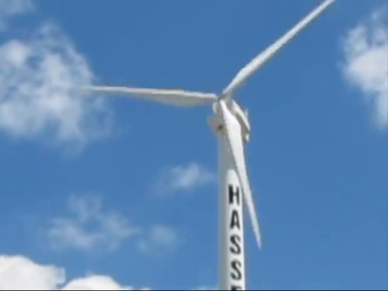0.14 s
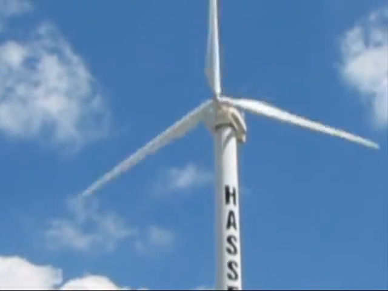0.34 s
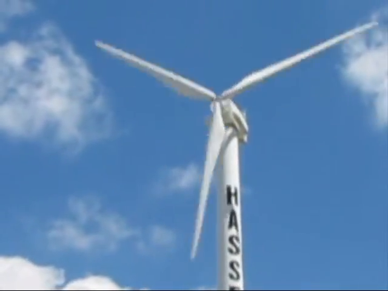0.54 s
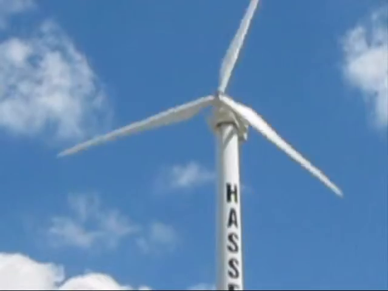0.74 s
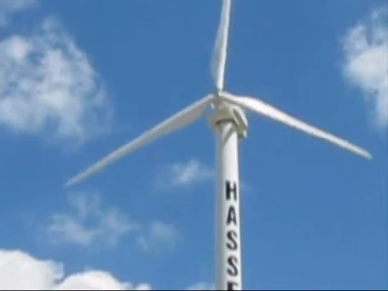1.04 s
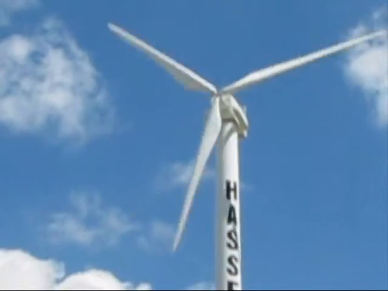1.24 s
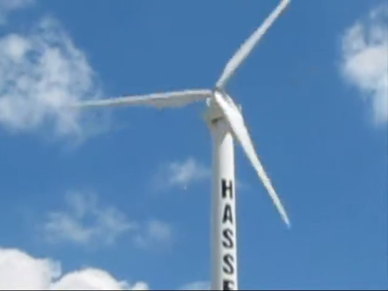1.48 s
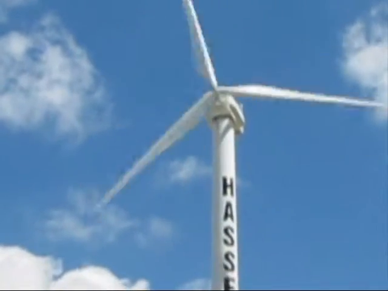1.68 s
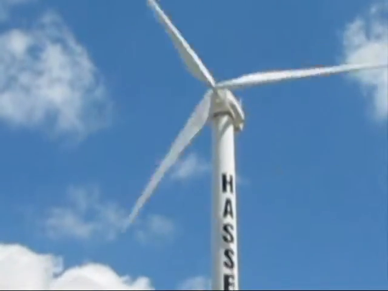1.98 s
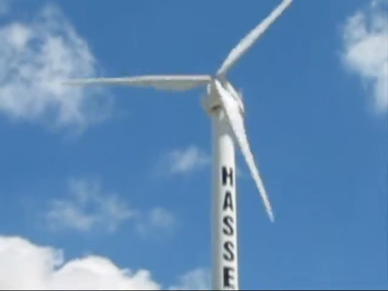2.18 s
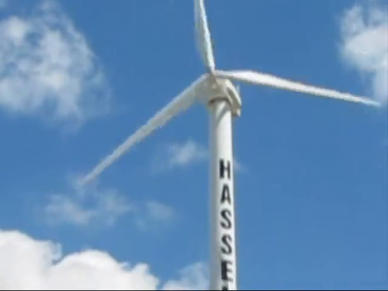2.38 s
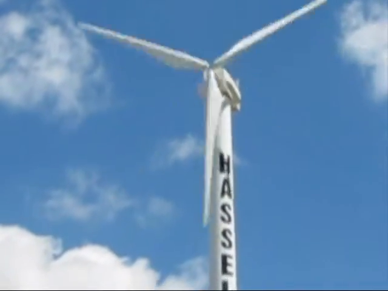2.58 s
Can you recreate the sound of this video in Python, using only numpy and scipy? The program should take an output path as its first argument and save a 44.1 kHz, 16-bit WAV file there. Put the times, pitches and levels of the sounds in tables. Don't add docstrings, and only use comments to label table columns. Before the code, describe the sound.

Low, fluttering wind noise hits an unprotected microphone below a wind turbine; after a brief calm start, irregular thumps continue, becoming denser and crackly late, over soft blade whooshes and coarse, grainy hiss.

```python
import sys
import numpy as np
from scipy import signal
from scipy.fft import rfft, irfft
from scipy.io import wavfile
from scipy.ndimage import uniform_filter1d, map_coordinates

SR = 44100
rng = np.random.default_rng(int(sys.argv[2]) if len(sys.argv) > 2 else 0)


def gain_from_db(level_db):
    decades = np.asarray(level_db, float) / 20
    return 10 ** decades


def materialize(psi):
    bounded = np.clip(np.atleast_2d(psi).T, -1, 1)
    quanta = np.round(bounded * 32767).astype(np.int16)
    wavfile.write(sys.argv[1], SR, quanta)


N = 119952


def read(points, hz):
    point_hz, level_db = np.transpose(points)
    return np.interp(np.log(hz + 1), np.log(point_hz + 1), level_db)


def evened(x):
    return x / np.sqrt(np.mean(x ** 2) + 1e-20)


def curve(table, column):
    rows = np.array(table)
    return np.interp(np.arange(N) / SR, rows[:, 0], rows[:, column])


def lumps(rate_hz):
    b, a = signal.butter(2, rate_hz, fs=SR)
    return evened(signal.lfilter(b, a, rng.standard_normal(N)))


def noise(spectrum, patchy_db, size):
    frames = 4 * N // size + 5
    hz = np.fft.rfftfreq(size, 1 / SR)
    real, imag, patches = rng.standard_normal((frames, len(hz), 3)).T
    patches = uniform_filter1d(patches, size=5, axis=0)
    patches = evened(uniform_filter1d(patches, size=5, axis=1))
    level_db = read(spectrum, hz)[:, None] + patchy_db * patches
    spectra = (real + 1j * imag) * gain_from_db(level_db)
    return evened(signal.istft(spectra, nperseg=size, noverlap=3 * size // 4)[1][:N])


def wind():
    # start_s, strength_db, small_eddies_db
    gusts = [(0.0, -55, -9), (0.06, -54.5, -10), (0.33, -43, -6.5), (1.07, -43, -5.5), (1.14, -44, -5.5),
             (1.17, -40.5, 0.5), (1.21, -48, -7), (1.3, -39.5, -10.5), (1.67, -44.5, -3.5),
             (1.69, -38, -9.5), (2.08, -49, 0.5), (2.14, -47.5, -3), (2.19, -44.5, -5), (2.72, -42, 1)]
    # frequency_hz, density_db (per Hz)
    large_eddies = [(12, -20), (20, -15.5), (65, -1), (129, -1), (220, -7), (394, -21), (897, -31),
                    (2640, -66)]
    # frequency_hz, density_db (per Hz)
    small_eddies = [(60, -29.5), (150, -3.5), (260, 2.5), (450, -6), (800, -15.5), (1500, -26.5),
                    (2500, -47.5), (5000, -66)]
    strength_db, small_db = curve(gusts, column=1), curve(gusts, column=2)
    rumble = noise(large_eddies, patchy_db=0.0, size=2048)
    rumble = rumble * gain_from_db(-2.5 + 0.41 * lumps(rate_hz=12))
    flutter = noise(small_eddies, patchy_db=2.5, size=512)
    flutter = flutter * gain_from_db(-6 + small_db + 2.04 * lumps(rate_hz=74))
    return gain_from_db(strength_db) * (rumble + flutter)


def turbine():
    # start_s, level_db, brightness_db
    blades = [(0.0, -71, 4), (0.01, -86, -4.5), (0.42, -68, 1.8), (0.51, -63.5, 0), (0.58, -69.5, 0.5),
              (0.69, -75, -1), (0.98, -65, -1.2), (1.2, -78.5, -1.5), (1.43, -67.5, -2), (1.45, -73.5, 9),
              (1.64, -67.5, 0), (2.05, -73.5, -4), (2.07, -75.5, 1), (2.67, -82.5, 3), (2.7, -66, -13),
              (2.72, -90, -4)]
    # frequency_hz, density_db (per Hz)
    swish_spectrum = [(200, 1), (500, 7), (1000, 5), (1600, 4), (2000, -2), (3000, -1), (4200, -9.5),
                      (5500, -16.5)]
    level_db, brightness_db = curve(blades, column=1), curve(blades, column=2)
    body = noise(swish_spectrum, patchy_db=1.5, size=1024)
    high_pass = signal.firwin(101, 1930, pass_zero=False, fs=SR)
    top = signal.oaconvolve(body, high_pass, "same")
    swish = (body - top) * gain_from_db(-brightness_db) + top
    swish = swish * gain_from_db(5 + level_db + 0.39 * lumps(rate_hz=35))
    tone_hz, tone_db = 2998, -90
    tone = np.sqrt(2) * np.sin(2 * np.pi * tone_hz * np.arange(N) / SR)
    return swish + gain_from_db(tone_db) * tone


def flicks(table, gain_db, turns, rough, below_db, above_db):
    size = 4096
    out = np.zeros(N + size)
    t, hz = (np.arange(size) - size // 2) / SR, np.fft.rfftfreq(size, 1 / SR)
    draws, phases = rng.standard_normal((len(table), size)), 2 * np.pi * rng.random(len(table))
    for (start_s, peak_db, centre_hz), draw, phase in zip(table, draws, phases):
        octaves = np.log2((hz + 1) / centre_hz)
        rise_db = -below_db * octaves
        fall_db = above_db * octaves - 3.5 * octaves ** 2
        colour = gain_from_db(np.where(octaves > 0, fall_db, rise_db))
        bell = np.exp(-(t * centre_hz / turns) ** 2)
        swing = np.fft.fftshift(irfft(colour * np.exp(1j * phase)))
        roughness = rough * evened(irfft(rfft(draw) * colour))
        burst = bell * (swing / abs(swing).max() + roughness)
        at = round(start_s * SR)
        out[at:at + size] += gain_from_db(peak_db + gain_db) * burst / abs(burst).max()
    return out[size // 2:N + size // 2]


def eddies():
    # start_s, peak_db, centre_hz
    large = [(0.333, -34.5, 99), (0.412, -34.5, 94), (0.437, -35, 123), (0.455, -46, 85),
             (0.477, -39.5, 75), (0.508, -39, 96), (0.557, -32.5, 116), (0.583, -31.5, 101),
             (0.616, -30.5, 150), (0.634, -33.5, 165), (0.687, -31.5, 135), (0.711, -44, 102),
             (0.786, -44, 116), (0.802, -45, 140), (0.829, -40, 102), (0.848, -39, 115), (0.925, -34, 113),
             (0.945, -38.5, 135), (0.968, -36, 117), (1.019, -33, 117), (1.067, -33.5, 132),
             (1.095, -36.5, 90), (1.156, -32.5, 117), (1.176, -36, 157), (1.263, -37.0, 125),
             (1.283, -56, 127), (1.308, -33, 124), (1.328, -52, 134), (1.377, -37.4, 140), (1.41, -34, 114),
             (1.434, -33.1, 107), (1.541, -41, 177), (1.6, -41, 119), (1.633, -33.5, 155),
             (1.687, -54, 114), (1.731, -28, 96), (1.786, -36, 96), (1.83, -34.5, 128), (1.865, -32, 126),
             (1.931, -37, 120), (1.992, -34.5, 115), (2.04, -34, 169), (2.056, -31.5, 146),
             (2.081, -35.5, 118), (2.126, -36, 158), (2.163, -46, 102), (2.188, -36, 116),
             (2.239, -34.3, 120), (2.262, -36, 84), (2.307, -30, 134), (2.365, -36, 112), (2.386, -33, 140),
             (2.431, -32, 139), (2.519, -35.5, 165), (2.552, -36, 99), (2.573, -36, 88), (2.611, -35, 161),
             (2.651, -35, 177), (2.675, -48, 139), (2.698, -43, 156)]
    # start_s, peak_db, centre_hz
    middle = [(0.4403, -37, 252), (0.5473, -42.3, 248), (0.5668, -43.4, 350.0), (0.6271, -32.5, 357),
              (0.6767, -41, 360.0), (0.6896, -41, 320.0), (0.74, -42.7, 343), (0.9392, -41.0, 247),
              (0.9693, -41, 270.0), (1.0068, -38, 220.0), (1.0183, -39, 235), (1.0927, -42, 240.0),
              (1.1578, -43, 264), (1.1669, -41.5, 303), (1.1754, -36.5, 218), (1.2693, -37, 222),
              (1.3023, -54, 220.0), (1.3952, -36.5, 332), (1.439, -38, 270.0), (1.5005, -42, 300.0),
              (1.544, -39, 220.0), (1.5871, -39.5, 280.0), (1.6064, -36, 267), (1.6318, -51, 220.0),
              (1.7188, -50, 248), (1.7446, -43.2, 220.0), (1.8608, -61, 260.0), (2.0233, -39, 410.0),
              (2.047, -28.5, 253), (2.0733, -36, 300.0), (2.118, -38.5, 425), (2.1912, -38, 384),
              (2.2158, -40, 332), (2.2411, -48, 270.0), (2.2745, -36, 248), (2.2887, -36, 340.0),
              (2.2981, -32.5, 254), (2.3268, -38, 303), (2.3653, -34, 294), (2.3771, -50, 298),
              (2.3903, -38, 320.0), (2.4011, -51, 280.0), (2.423, -35.5, 360), (2.442, -35.5, 387),
              (2.4528, -31, 307), (2.4619, -28.5, 285), (2.4742, -32.1, 322), (2.4871, -40, 350.0),
              (2.5024, -30.5, 467), (2.5178, -64, 250.0), (2.5398, -43, 282), (2.572, -51, 320.0),
              (2.6046, -33, 387), (2.6167, -30.5, 402), (2.631, -40, 340.0), (2.6408, -34, 360.0),
              (2.6499, -43, 286), (2.6768, -45, 350.0), (2.6961, -27.5, 390), (2.7151, -34, 273)]
    # start_s, peak_db, centre_hz
    smallest = [(0.627, -44, 700), (0.674, -68, 700), (0.8473, -48.5, 1280.0), (0.9468, -64, 940.0),
                (0.9577, -51, 1220.0), (1.0959, -46, 810), (1.3953, -41.5, 730.0), (1.5003, -45.5, 960),
                (2.0468, -40, 1230), (2.0666, -43.5, 940), (2.0725, -59, 850.0), (2.1156, -64, 730.0),
                (2.123, -59, 800), (2.1908, -44.5, 724), (2.1964, -58, 820.0), (2.2727, -68, 770.0),
                (2.297, -47, 730.0), (2.3124, -49.5, 730.0), (2.3647, -46, 730.0), (2.3819, -60, 1010.0),
                (2.4008, -49, 730.0), (2.4232, -44, 1110.0), (2.4286, -51, 860.0), (2.4427, -55.2, 730.0),
                (2.4525, -55, 1240.0), (2.4569, -50, 920.0), (2.474, -40.5, 865), (2.4807, -71, 730.0),
                (2.4865, -70, 860.0), (2.501, -45, 1400.0), (2.5051, -38.5, 1070), (2.5151, -63, 790.0),
                (2.5238, -42, 1030.0), (2.527, -53, 1760), (2.5364, -41.5, 1080), (2.54, -50.8, 1210.0),
                (2.5437, -60, 1040.0), (2.5478, -67, 750.0), (2.5715, -58, 730.0), (2.5888, -46.5, 1270.0),
                (2.613, -61, 730.0), (2.6167, -59, 845), (2.6206, -38, 810), (2.6348, -57, 1520.0),
                (2.6446, -43.0, 1310), (2.6475, -39, 820.0), (2.6563, -60, 1520.0), (2.6592, -61, 895),
                (2.6704, -60, 890.0), (2.6745, -42, 1050.0), (2.6877, -68, 890.0), (2.6922, -39, 790),
                (2.6969, -38, 780.0), (2.6997, -66, 970.0), (2.7047, -57, 1000.0), (2.7082, -58, 930.0),
                (2.7132, -70, 1170.0)]
    thumps = flicks(large, gain_db=-0.3, turns=2.3, rough=0.22, below_db=-14.5, above_db=-14)
    buffets = flicks(middle, gain_db=-1.0, turns=2.0, rough=0.29, below_db=-16.5, above_db=-13)
    pops = flicks(smallest, gain_db=0.5, turns=2.4, rough=0.19, below_db=-4, above_db=-15.5)
    return thumps + buffets + pops


def scene():
    return (wind() + eddies() + turbine())[None]


def top_cut(x):
    return signal.sosfilt(signal.butter(12, 15740, fs=SR, output="sos"), x)


def record(dry):
    camera_hz, held_hz = 11024, 48000
    ceiling, step = gain_from_db(-26), gain_from_db(-64.5)
    x = np.pad(dry[0], (0, 600), "reflect")
    x = ceiling * np.tanh(x / ceiling)
    x = signal.oaconvolve(x, signal.firwin(255, 5500, fs=SR), "same")
    sample_at = np.arange(len(x) * camera_hz // SR + 2) * SR / camera_hz
    slow = map_coordinates(x, [sample_at], order=3, mode="nearest")
    slow = slow + step * (rng.random(len(slow)) - .5)
    held = slow[np.arange(len(x) * held_hz // SR) * camera_hz // held_hz]
    out = signal.resample_poly(held, SR // 300, held_hz // 300)
    top_filter = signal.firwin(511, 15790, window=("kaiser", 9), fs=SR)
    out = signal.oaconvolve(out, top_filter, "same")[:N]
    return top_cut(out[None])


dry = scene()
out = record(dry)
materialize(out)
```